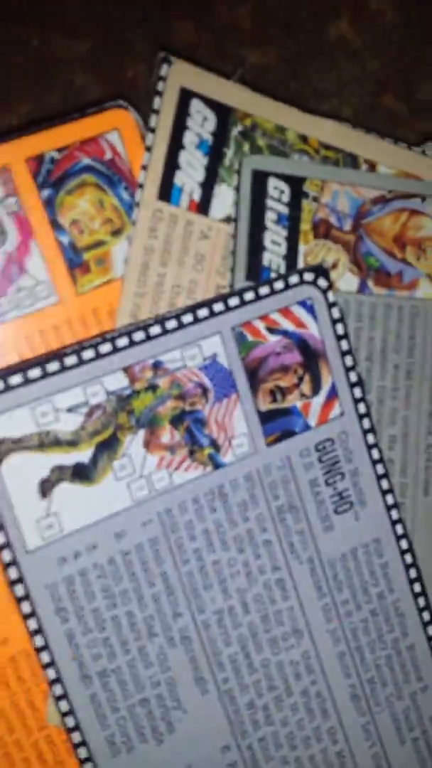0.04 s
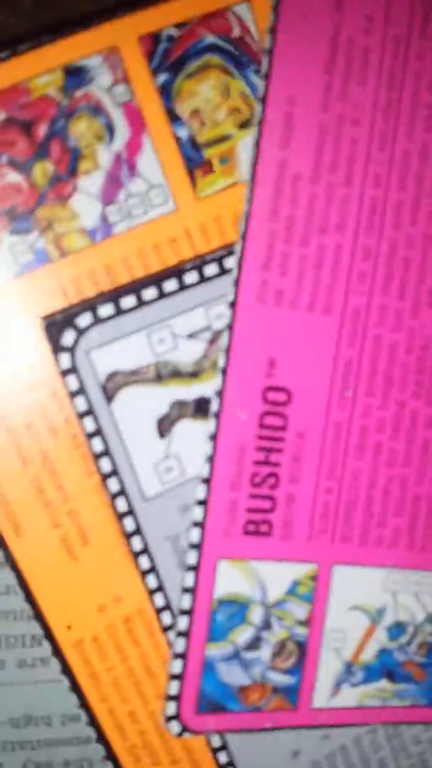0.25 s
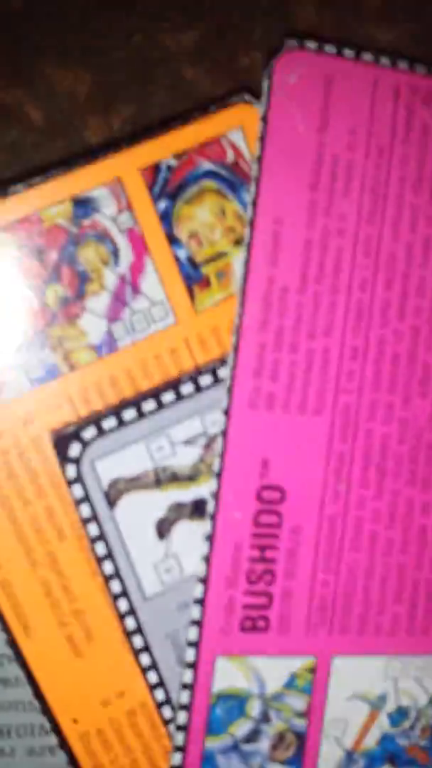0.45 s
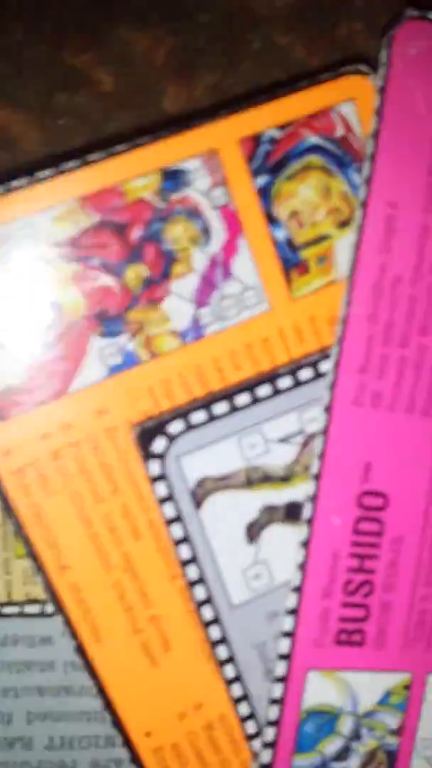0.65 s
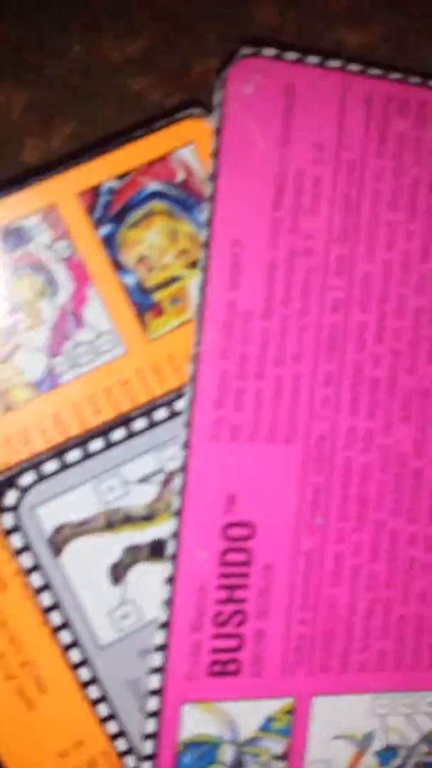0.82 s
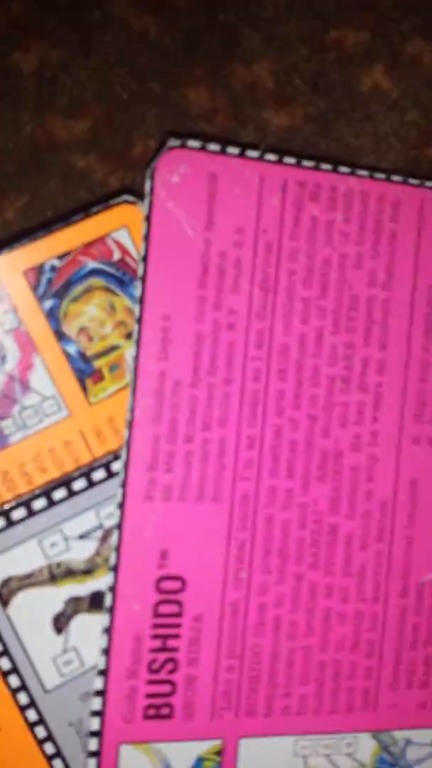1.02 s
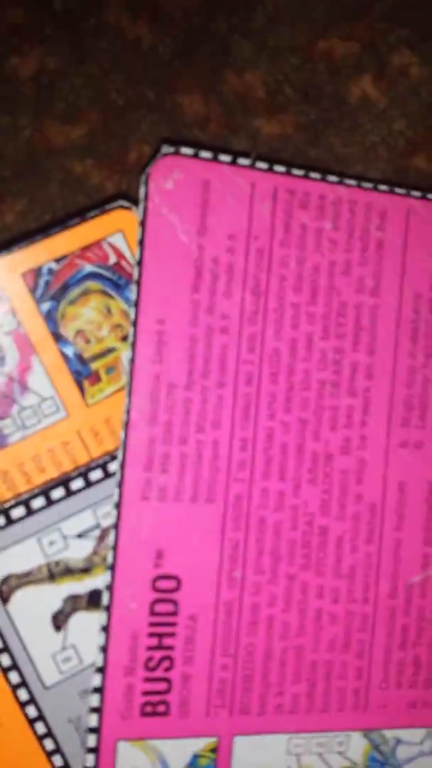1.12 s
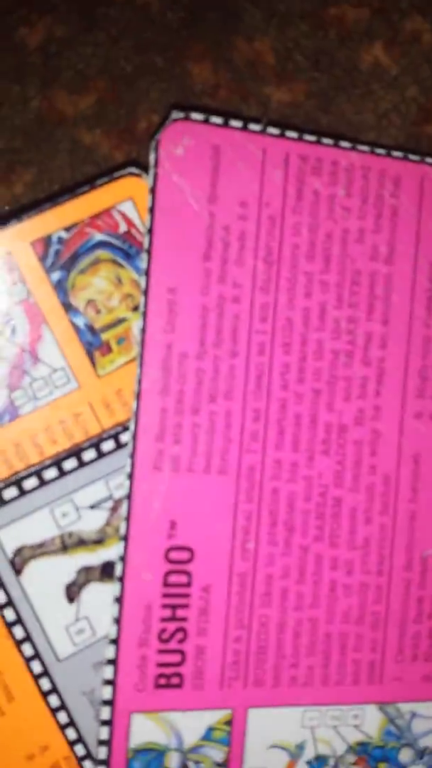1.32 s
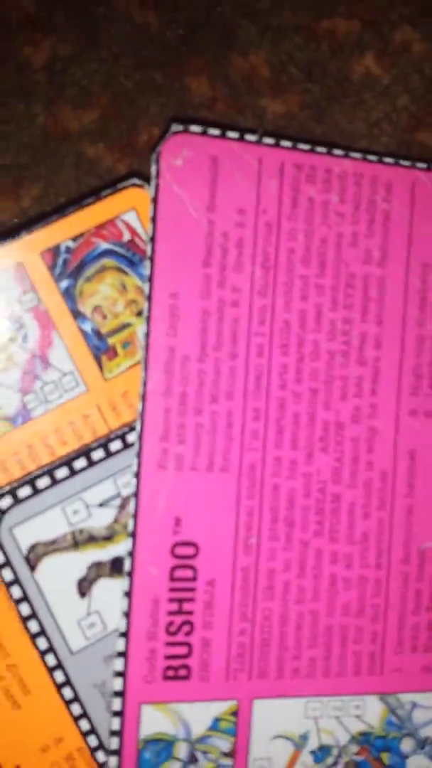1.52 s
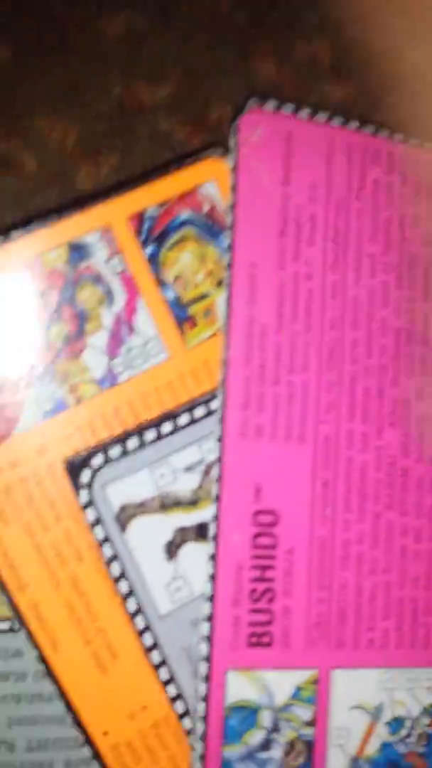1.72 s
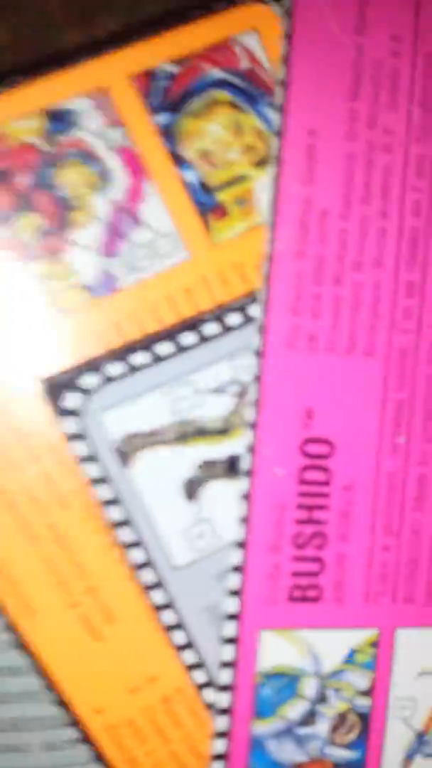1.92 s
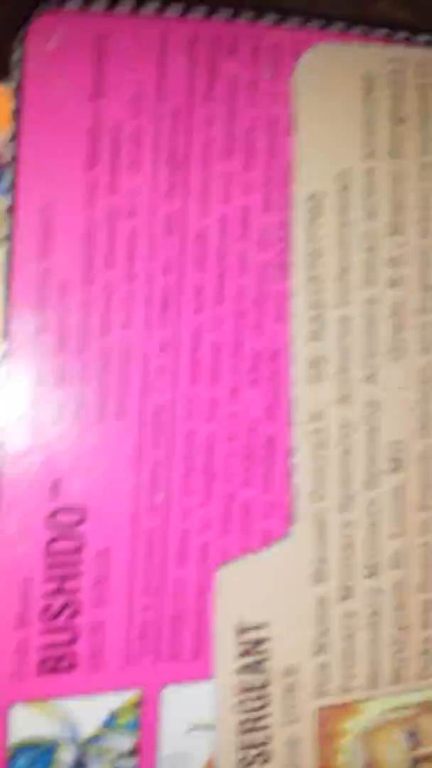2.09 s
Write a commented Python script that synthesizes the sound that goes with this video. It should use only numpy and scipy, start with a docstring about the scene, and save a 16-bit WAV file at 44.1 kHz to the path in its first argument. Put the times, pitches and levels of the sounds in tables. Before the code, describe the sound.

Stiff cardboard cards are laid on a pile, close to the microphone in a small room. At about 0.2 seconds one snaps sharply off the fingers with a light table thud. After a pause, the next slides softly off the stack in two strokes, from 1.0 to 1.6 seconds, with small ticks. It slaps down at about 1.85 seconds. Quiet air noise and a faint low hum lie underneath.

```python
"""A small room, close to a table where stiff cardboard cards are laid on a pile.
One card snaps off the fingers onto the pile; the next is slid off the stack in two strokes and slapped down.
Each blow is a push and a chatter of tiny contacts that ring the card; sliding fibres catch and slip.
The table thuds under the blows, over quiet air noise and a low hum."""
import sys
import numpy as np
from scipy import signal
from scipy.fft import rfft, irfft
from scipy.io import wavfile
from scipy.ndimage import uniform_filter1d

SR = 44100
rng = np.random.default_rng(int(sys.argv[2]) if len(sys.argv) > 2 else 0)


def transcribe(signal):
    """Save signal, clipped to [-1, 1], as a 16-bit WAV file at the path in sys.argv[1]."""
    frames = np.atleast_2d(signal).T
    limited = np.clip(frames, -1, 1)
    pcm = np.round(limited * 32767).astype(np.int16)
    wavfile.write(sys.argv[1], SR, pcm)


N = 94815

# air noise (frequency [Hz], level [dB])
AIR_SPECTRUM = [(20, -18), (40, -9), (62, -11), (98, -4), (135, -15), (170, -11.5), (220, -5.5),
                (300, -20.5), (400, -12.5), (600, -28), (1000, -22.5), (1800, -24.5), (3600, -34),
                (8000, -35.5), (13800, -38.5), (15000, -41)]
# air noise gain (time [s], bass [dB], middle [dB], treble [dB])
AIR_GAINS = [(0, -2, 4, 2), (0.4, -0.5, 2, 0.5), (0.75, -5.5, 2.5, -0.5), (1.0, -4, 0, -2),
             (1.3, -3, -4, 0), (1.6, 2, 2, 0.3), (1.75, -5, -4.5, -3.9), (2.0, -6, -5.5, -3),
             (2.15, -4, -5.5, -4)]
# hum (time [s], level [dB])
HUM_ENVELOPE = [(0, -60.5), (0.4, -58), (0.68, -60), (0.765, -50), (0.85, -64), (1.2, -61.5), (1.7, -60.5),
                (2.0, -70.5)]
# a scuff, then two strokes off the stack (time [s], level [dB], tilt [dB/octave])
SLIDE_STROKES = [(0.18, -65, 8), (0.192, -41.5, -0.5), (0.203, -48.5, -4), (0.215, -55.5, -1.5),
                 (0.3, -67.5, 3.5), (1.0, -65.5, -6), (1.03, -52, 2), (1.055, -52.5, -3.5),
                 (1.072, -44, -0.5), (1.095, -49.5, -3), (1.135, -48, -1), (1.16, -40, -.5),
                 (1.183, -41.5, 0.5), (1.215, -54.5, -2), (1.29, -67, -6), (1.34, -47, 0), (1.37, -46, 1),
                 (1.405, -53.5, -3), (1.47, -45, 3), (1.51, -48.5, 1.5), (1.565, -43.5, 4),
                 (1.585, -52, -4.5), (1.63, -66.5, 5.5)]
# sliding card (frequency [Hz], left [dB], right [dB])
SLIDE_SPECTRUM = [(150, -8, -16.5), (500, -10, -9.5), (906, -9.5, -6.5), (1270, 0, -8.5), (1900, 1, -7),
                  (2620, -8, -8.5), (3500, -7, -8.5), (4400, -0.5, -8.5), (4500, -6.5, -6.5),
                  (5060, 1.5, -9), (5680, -4, -4.5), (6900, -7, -3.5), (8440, -20, -3), (10300, -21, -8),
                  (12050, -17, -10), (14600, -29, -17.5)]
# card edge flicks (time [s], level [dB], tilt [dB/octave], chatter share [0-1], chatter decay [s],
# left-right [dB], resonance [Hz], resonance lift [dB])
EDGE_SNAPS = [(0.188, -23.5, -6.5, 0.65, 0.0011, 6, 880, 3), (0.2004, -30, 0, 0.4, 0.00062, 2, 3570, 17),
              (0.2359, 3, -0.17, 0.3, 0.0024, 0, 3750, 1.5),
              (0.2498, -13, -2.5, 0.96, 0.0034, 8, 3250, 5.5), (0.2590, -6, -2, 0.57, 0.0026, 5.5, 2850, 7),
              (0.261, -11, 2.5, 0.8, 0.0022, -0.5, 5440, 11), (0.2746, -17, -1, 1, 0.004, -5, 5500, 7.5),
              (0.3194, -31, -4.5, 0.8, 0.0038, 10, 2560, 18),
              (0.386, -36.5, 13, 0.7, 0.00097, -15, 6800, 5), (0.4592, -36.5, 1, 0.95, 0.0005, 9, 5500, 9),
              (1.0173, -23, -0.5, 0.2, 0.0024, 6.5, 1980, 9.5)]
# card slaps and light ticks (columns as EDGE_SNAPS)
SLAPS_AND_TICKS = [(0.3285, -30.5, -7, 1, 0.0023, 3, 900, 2.5), (1.108, -24.5, 0.5, 0.7, .002, 6, 700, 3.4),
                   (1.5902, -25.5, -3, 1, 0.0014, -2, 7090, 17),
                   (1.788, -34.5, -6.5, 0.66, 0.00097, 5, 700, 1.7),
                   (1.8320, -1.5, -0.8, 0.91, 0.0026, 0.5, 4000, 6.8),
                   (1.8436, -15.5, -3, 1, 0.0012, -7, 890, 3), (1.8572, -10, 4, 1, 0.0017, 8.5, 5600, 4.8),
                   (1.8614, -2.5, 0, 0.99, 0.0051, 3.5, 1870, 9.8),
                   (1.868, -14.5, 3, 0.8, 0.0031, -0.5, 6600, 5.1),
                   (1.8819, -19, -2, 0.94, 0.0046, 0, 3000, 2.2),
                   (1.906, -34.5, 3, 0.51, 0.0015, -2.5, 5800, 5.1)]
# flicked card (frequency [Hz], level [dB])
SNAP_SPECTRUM = [(40, -24.5), (130, -6), (370, -9), (500, -13), (640, -14), (960, -9.5), (1650, -11),
                 (2100, -3.5), (2450, -9.5), (2750, -10.5), (3050, -0.5), (3450, -8.5), (3900, 0.5),
                 (4200, 1), (4650, 0), (5000, -6), (5600, -9), (6100, -4), (6700, -8.5), (7300, -6.5),
                 (10000, -21.5), (12500, -35), (14500, -46)]
# card in slaps and ticks (frequency [Hz], level [dB])
SLAP_SPECTRUM = [(40, -33.5), (170, -3.5), (350, -9), (520, -4), (900, 0), (1300, -1), (1900, -6),
                 (2650, 0), (3300, -5), (4300, -7.5), (5200, -5.5), (7200, -11), (10000, -29.5),
                 (14500, -35.5)]
# flicked card's modes (frequency [Hz], level [dB], t60 [s])
SNAP_BENDING = [(473.4, -36.5, 0.065), (963, -28, 0.022), (2187, -25, 0.014)]
# card's modes in slaps and ticks (frequency [Hz], level [dB], t60 [s])
SLAP_BENDING = [(492, -38, 0.08), (688, -38, 0.09), (940, -35.5, 0.081), (2200, -44, 0.029)]
# blows at the microphone ports (frequency [Hz], left-right [dB])
PORT_BALANCE = [(100, -2.5), (900, -1), (1600, 6.5), (2200, -3), (3000, 1), (4400, 1), (6000, 0),
                (7300, -6.5), (9000, -15), (11000, -11), (15000, -10.5)]
# likeness of the two ports (frequency [Hz], coherence [0-1])
PORT_COHERENCE = [(30, 0), (70, 0.95), (140, 0.9), (290, 0.93), (750, 0.55), (1400, 0.1), (3100, 0.0062)]
# knocks on the table (time [s], level [dB], pitch [Hz], t60 [s])
TABLE_KNOCKS = [(0.1899, -34.5, 255, 0.041), (0.2362, -32, 146, 0.079), (0.2608, -37, 194, 0.083),
                (1.113, -47, 231, 0.087), (1.5917, -36.5, 247, 0.093), (1.605, -45.5, 185.4, 0.49),
                (1.8342, -24.5, 168, 0.042), (1.8620, -56.5, 212, 0.055), (1.979, -35.5, 76.2, 0.046)]
# room tail (frequency [Hz], t60 [s])
TAIL_DECAY = [(100, 0.205), (500, 0.1), (2000, 0.15), (6500, 0.33), (14000, 0.08)]
# room tail (frequency [Hz], gain [dB])
TAIL_SPECTRUM = [(100, 6), (500, -2.5), (1500, -8.5), (3000, -17.5), (4300, -21.5), (5600, -21),
                 (8000, -16.5), (14000, -2.5)]


def amp(db):
    """Decibels to gain."""
    return 10 ** (np.asarray(db) / 20)


def unit(x):
    """Scales to rms 1."""
    return x / np.sqrt(np.mean(x ** 2) + 1e-20)


def at_hz(points, hz):
    """Interpolates over log frequency."""
    f, value = np.transpose(points)
    return np.interp(np.log(hz + 1), np.log(f + 1), value)


def at_time(rows, t):
    """Interpolates every column over time."""
    times, *columns = np.transpose(rows)
    return [np.interp(t, times, column) for column in columns]


def add(mix, start_s, sound):
    """Mixes a sound in."""
    part = mix[:, round(start_s * SR):][:, :sound.shape[-1]]
    part += sound[..., :part.shape[1]]


def port_noise(size):
    """White noise at two ports, alike in the bass, unrelated in the treble."""
    common, separate = rfft(rng.standard_normal((2, size)))
    coherence = at_hz(PORT_COHERENCE, np.fft.rfftfreq(size, 1 / SR))
    right = coherence * common + np.sqrt(1 - coherence ** 2) * separate
    return irfft(np.array([common, right]), size)


def minimum_phase(db):
    """Response of the most compact ring with this spectrum."""
    log_gain = np.log(amp(np.concatenate([db, db[:, -2:0:-1]], axis=1)))
    return np.exp(np.conj(signal.hilbert(log_gain)))[:, :db.shape[1]]


def shaped(x, gain_db, size=512):
    """Applies gain_db(hz, t)."""
    frames = dict(fs=SR, nperseg=size, noverlap=size * 3 // 4)
    hz, t, spectra = signal.stft(x, **frames)
    return signal.istft(spectra * amp(gain_db(hz[:, None], t)), **frames)[1][:, :x.shape[1]]


def drift(size):
    """Smooth random wander over about size samples, rms 1."""
    return unit(uniform_filter1d(uniform_filter1d(rng.standard_normal(N), size), size))


def noise_band(centre_hz, width_hz):
    """Noise in one resonance, rms 1."""
    def peak_db(hz, t):
        return -20 * np.log10(1 + ((hz - centre_hz) / width_hz) ** 2)
    return unit(shaped(port_noise(N), peak_db, size=4096))


def air(bass_below_hz=500, treble_above_hz=4000):
    """Soft air noise with two faint whining bands; the level moves slowly."""
    def gain_db(hz, t):
        bass, middle, treble = at_time(AIR_GAINS, t)
        return np.where(hz < bass_below_hz, bass, np.where(hz < treble_above_hz, middle, treble))
    noise = amp(-53.5) * unit(shaped(port_noise(N), lambda hz, t: at_hz(AIR_SPECTRUM, hz), size=4096))
    whine = amp(-70.5) * noise_band(centre_hz=1160, width_hz=10)
    drone = amp(-68.5) * noise_band(centre_hz=1430, width_hz=102)
    return shaped(noise + whine + drone, gain_db, size=4096)


def hum(pitch_hz=181, waver_hz=3, flutter=0.36):
    """A low tone that wavers and flutters."""
    hz = pitch_hz + waver_hz * drift(3000)
    tone = np.sin(2 * np.pi * np.cumsum(hz) / SR)
    level_db, = at_time(HUM_ENVELOPE, np.arange(N) / SR)
    return amp(level_db) * unit(tone * (1 + flutter * drift(500)))


def patches(hz, t, bins=5, frames=12):
    """Random hills in frequency and time, as the touching area changes."""
    field = rng.standard_normal((len(hz), len(t)))
    return unit(uniform_filter1d(uniform_filter1d(field, bins, axis=0), frames, axis=1))


def card_slide(grains_per_s=3500, spread_db=1, patch_db=2.37):
    """Fibres catch and slip, card on card; each stroke swells, fades and shifts in brightness."""
    catches = rng.random(N) < grains_per_s / SR
    grains = catches * amp(spread_db * np.minimum(rng.exponential(1, N), 4))
    rub = unit(grains * port_noise(N)) + port_noise(N)
    f, *ports = np.transpose(SLIDE_SPECTRUM)

    def colour_db(hz, t):
        base_db = np.array([at_hz(np.c_[f, port], hz) for port in ports])
        _, tilt_db_oct = at_time(SLIDE_STROKES, t)
        return base_db + tilt_db_oct * np.log2((hz + 100) / 5000) + patch_db * patches(hz, t)
    level_db, _ = at_time(SLIDE_STROKES, np.arange(N) / SR)
    return unit(shaped(rub, colour_db)) * amp(level_db)


def card_contact(spectrum, tilt_db_oct, chatter_share, decay_s, pan_db, resonance_hz, lift_db,
                 q=2.4, flex_delay_s=0.0011, flex_hz=5000, port_lag_s=2e-5, size=4096):
    """A push and a chatter of tiny contacts ring the card; the spot struck favours one resonance."""
    t, hz = np.arange(size) / SR, np.fft.rfftfreq(size, 1 / SR)
    sides = np.array([[0.5], [-0.5]])
    # low bending waves cross the card more slowly
    flex_cycles = flex_delay_s * flex_hz * np.arctan(hz / flex_hz)
    push = np.exp(-2j * np.pi * (flex_cycles + hz * port_lag_s * (sides + 0.5)))
    chatter = rfft(unit(port_noise(size) * np.exp(-t / decay_s)) / np.sqrt(size))
    force = np.sqrt(1 - chatter_share) * push + np.sqrt(chatter_share) * chatter
    octaves = np.log2(np.maximum(hz, 300) / 3000)
    resonance_db = lift_db / (1 + (2 * q * (hz / resonance_hz - 1)) ** 2)
    balance_db = sides * (pan_db + at_hz(PORT_BALANCE, hz))
    body = minimum_phase(at_hz(spectrum, hz) + resonance_db + tilt_db_oct * octaves + balance_db)
    body /= np.sqrt(np.mean(abs(body) ** 2))
    return amp(5) * irfft(body * force)


def card_ring(modes, tilt_db_oct, rise_s=0.0005):
    """A struck card swings briefly in its bending modes."""
    t = np.arange(4096) / SR
    ring = np.zeros_like(t)
    for hz, level_db, t60_s in modes:
        envelope_db = level_db + tilt_db_oct * np.log2(hz / 1500) - 60 * t / t60_s
        ring += amp(envelope_db) * np.sin(2 * np.pi * hz * t)
    return ring * (1 - np.exp(-(t / rise_s) ** 2))


def card_blows(blows, spectrum, modes):
    """Each snap, slap or tick is a contact plus the card's ring."""
    out = np.zeros((2, N))
    for start_s, level_db, tilt_db_oct, *touch in blows:
        blow = card_contact(spectrum, tilt_db_oct, *touch) + card_ring(modes, tilt_db_oct)
        add(out, start_s, amp(level_db) * blow)
    return out


def room_echo(x, near_db=-11.5, near_decay_s=0.006, tail_rise_s=0.0046):
    """Quick reflections from table and hands, then the room's short tail."""
    size = SR // 2
    t = np.arange(size) / SR
    near = unit(port_noise(size) * np.exp(-t / near_decay_s) * (t > 0.001))
    tail = unit(shaped(port_noise(size), lambda hz, t: -60 * t / at_hz(TAIL_DECAY, hz), size=256))
    tail = shaped(tail, lambda hz, t: at_hz(TAIL_SPECTRUM, hz), size=256)
    tail *= np.minimum(t / tail_rise_s, 1) ** 2
    response = (amp(near_db) * near + tail) / np.sqrt(size)
    return signal.fftconvolve(x, response, axes=1)[:, :N]


def table_thuds(rise_s=0.00067):
    """Each knock leaves a low damped swing."""
    out, t = np.zeros((2, N)), np.arange(SR // 2) / SR
    for start_s, level_db, hz, t60_s in TABLE_KNOCKS:
        envelope = amp(level_db - 60 * t / t60_s) * (1 - np.exp(-t / rise_s))
        add(out, start_s, envelope * np.sin(2 * np.pi * hz * t))
    return out


def scene():
    """Cards, table and room; only the card blows echo."""
    snaps = card_blows(EDGE_SNAPS, SNAP_SPECTRUM, SNAP_BENDING)
    slaps_and_ticks = card_blows(SLAPS_AND_TICKS, SLAP_SPECTRUM, SLAP_BENDING)
    blows = snaps + slaps_and_ticks
    return blows + room_echo(blows) + table_thuds() + card_slide() + air() + hum()


def record(dry, low_cut_hz=51, high_cut_hz=14800):
    """The recorder thins the deep bass and limits the band."""
    highpass = signal.butter(2, low_cut_hz, "high", fs=SR, output="sos")
    lowpass = signal.firwin(301, high_cut_hz, window=("kaiser", 8), fs=SR)
    return signal.oaconvolve(signal.sosfilt(highpass, dry), lowpass[None], "same")


dry = scene()
out = record(dry)
transcribe(out)
```